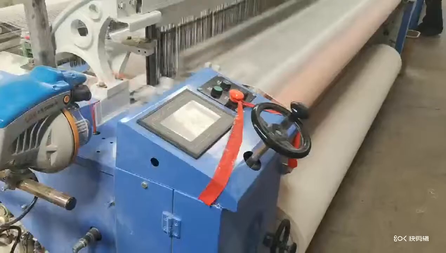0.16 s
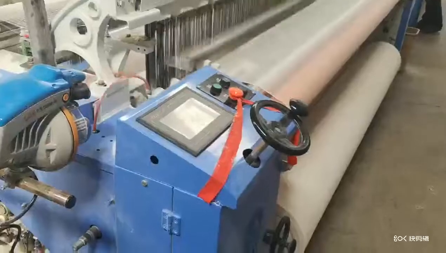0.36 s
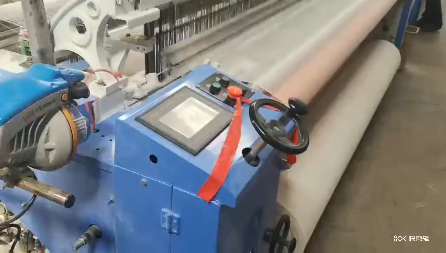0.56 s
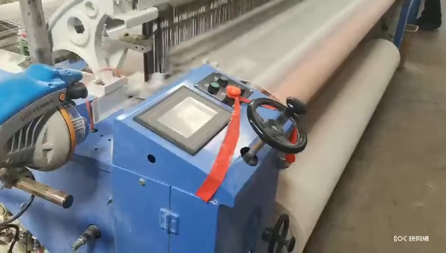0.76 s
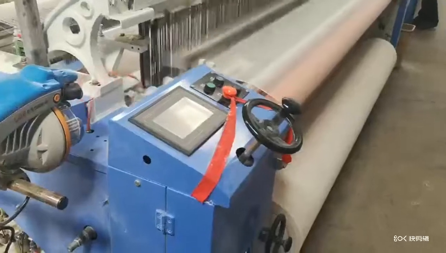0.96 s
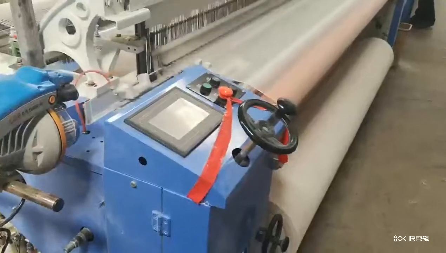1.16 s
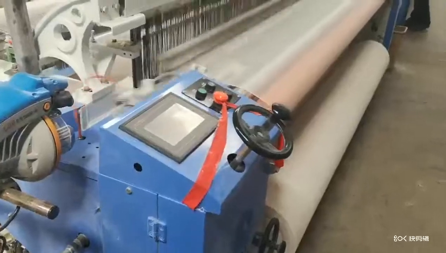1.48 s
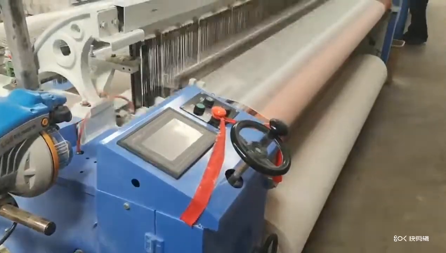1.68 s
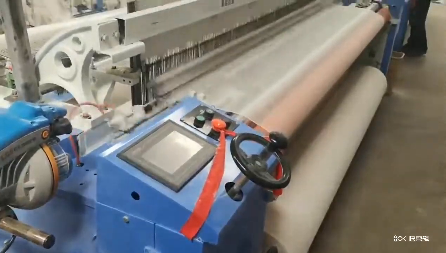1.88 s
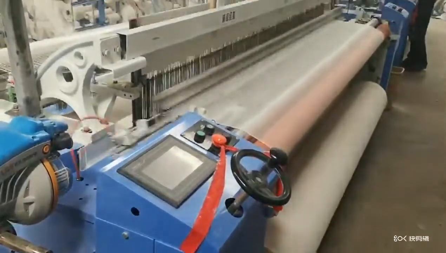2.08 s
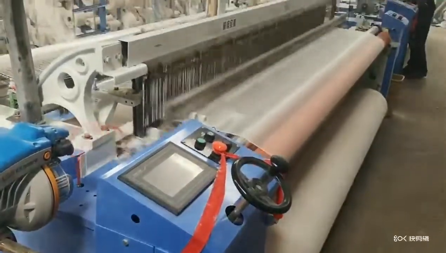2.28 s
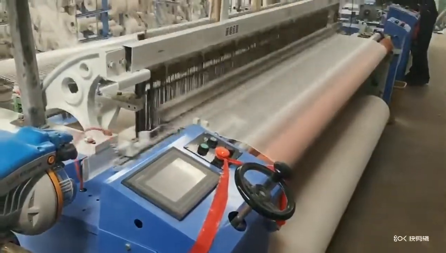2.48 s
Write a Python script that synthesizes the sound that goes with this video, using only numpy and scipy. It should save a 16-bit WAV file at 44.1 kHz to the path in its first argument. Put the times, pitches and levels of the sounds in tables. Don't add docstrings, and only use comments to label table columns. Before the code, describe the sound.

An air jet loom, silent until about 0.25 s, then abruptly at full running noise until the end near 2.6 s. About 8.3 beats per second: low ringing frame thuds, dense heddle and reed clatter, bright air hisses. Other looms roar steadily behind, with floor rumble and faint high whines. From about 1.1 to 2 s the right side grows hollow and ringing as a hand cups the phone microphone; bass fades slightly.

```python
import sys
import numpy as np
from scipy import signal
from scipy.fft import rfft, irfft
from scipy.io import wavfile
from scipy.ndimage import uniform_filter1d

SR = 44100
rng = np.random.default_rng(int(sys.argv[2]) if len(sys.argv) > 2 else 0)


def decibels_to_gain(level_db):
    exponent = np.asarray(level_db, float) / 20
    return 10 ** exponent


def generate_wav(signal):
    frames = np.transpose(np.atleast_2d(signal))
    scaled = np.clip(frames, -1, 1) * 32767
    pcm = np.round(scaled).astype(np.int16)
    wavfile.write(sys.argv[1], SR, pcm)


N = 115542

PICKS_PER_S = 8.303


def rms_one(x):
    return x / np.sqrt(np.mean(x ** 2) + 1e-20)


def at_hz(points, hz):
    table = np.array(points)
    return np.interp(np.log(hz + 1e-3), np.log(table[:, 0]), table[:, 1])


def drift(rate_hz):
    pole = np.exp(-80 * np.pi * rate_hz / SR)
    noise = rng.standard_normal(N // 40 + 2002)
    slow = signal.lfilter([1], [1, -2 * pole, pole ** 2], noise)[2000:]
    return np.interp(np.arange(N) / 40, np.arange(len(slow)), rms_one(slow))


def ringing(hz, t60_s):
    radius = decibels_to_gain(-60 / (t60_s * SR))
    return [1, -2 * radius * np.cos(2 * np.pi * hz / SR), radius ** 2]


# pitch_hz, likeness [0-1]
PORT_LIKENESS = [(90, 1.), (180, 1), (290, 0.86), (640, 0.5), (1400, 0.44), (3100, 0.03), (6800, 0.01),
                 (15000, 0.07)]


def spread(three, spectrum, low_hz, high_hz):
    hz = np.fft.rfftfreq(N, 1 / SR)
    band = (hz > low_hz) * (hz < high_hz)
    both, left, right = rfft(three) * decibels_to_gain(at_hz(spectrum, hz)) * band
    alike = np.clip(at_hz(PORT_LIKENESS, hz), 0, 1)
    mixed = np.sqrt(alike) * both + np.sqrt(1 - alike) * np.array([left, right])
    return rms_one(irfft(mixed, N))


def per_pick(middle_s, sharpness, spread_db):
    rise_skew, open_share = 0.37, 0.16
    turns = (np.arange(N) / SR - middle_s) * PICKS_PER_S
    uneven_db = np.interp(turns, np.arange(-2, 38), rng.normal(0, spread_db, 40))
    angle = 2 * np.pi * turns
    opening = np.cos(angle + rise_skew * np.cos(angle)) + open_share
    swell = 1 / (1 + np.exp(-sharpness * opening))
    return rms_one(swell * decibels_to_gain(uneven_db))


# start_s (into the pick), pitch_hz, level_db, t60_s
FRAME_BLOWS = [(.0, 21, -38, .5), (.0, 32.4, -36.5, .6), (.0, 41.5, -37.5, .6), (.1, 140, -41, 0.59),
               (.1, 109, -43, .5), (.1, 124.9, -37.5, 1), (.1, 120, -37.5, 1), (.09, 163, -44.5, .4),
               (.07, 190, -49, 0.22), (.07, 249, -37, .5), (0.091, 277, -43.5, .4), (0.091, 302, -44, .4),
               (.09, 390, -42.5, 0.19), (0.092, 426, -42, 0.2)]


def frame():
    spread_db, jitter_s = 1.2, .0003
    alternate_db, alternate_hz = 2.5, 350
    out = np.zeros(N + SR)
    picks = np.arange(-6, 22)
    for start_s, pitch_hz, level_db, t60_s in FRAME_BLOWS:
        luck = rng.standard_normal((len(picks), 2))
        when_s = 1 + picks / PICKS_PER_S + start_s + jitter_s * luck[:, 0]
        alternation_db = alternate_db * (pitch_hz > alternate_hz) * np.cos(np.pi * picks)
        clicks = np.zeros(N + SR)
        places = np.clip(when_s * SR, 0, N + SR - 1).astype(int)
        clicks[places] = decibels_to_gain(spread_db * luck[:, 1] + alternation_db)
        mode = signal.lfilter([0, 1], ringing(pitch_hz, max(t60_s, .05)), clicks + 1e-18)
        out += decibels_to_gain(level_db) * rms_one(mode)
    return out[SR:]


def clatter():
    level_db, clicks_per_s, size_db, ring_cycles = -26, 5000, 3, 18.3
    swell = per_pick(middle_s=0.0037, sharpness=2.9, spread_db=.7)
    sizes = decibels_to_gain(size_db * np.minimum(rng.exponential(1, (3, N)), 5))
    sizes = sizes * rng.choice([-1, 1], (3, N))
    clicks = sizes * (rng.random((3, N)) < clicks_per_s * swell / SR)
    dealt = rng.integers(0, 16, N)
    out = 0
    for part, pitch_hz in enumerate(np.geomspace(850, 3000, 16)):
        struck = clicks * (dealt == part) + 1e-18
        out = out + signal.lfilter([1, 0, -1], ringing(pitch_hz, ring_cycles / pitch_hz), struck)
    tone = [(800, -5), (1500, -1), (2300, 4.2), (3000, 3)]  # pitch_hz, level_db
    return decibels_to_gain(level_db) * spread(out, tone, low_hz=556, high_hz=6300)


# pitch_hz, level_db (per Hz)
AIR_SPECTRUM = [(500, -25), (760, -16.5), (1100, -16), (2200, -6.5), (3300, -7), (5000, -2), (8000, 0.5),
                (15500, -3.5)]


def blast():
    level_db, left_lag_s = -21, 0.0029
    swell = per_pick(middle_s=0.012, sharpness=3, spread_db=.3) * decibels_to_gain(.6 * drift(30))
    swell = np.array([np.roll(swell, int(left_lag_s * SR)), swell])
    air = spread(rng.standard_normal((3, N)), AIR_SPECTRUM, low_hz=430, high_hz=16700)
    return decibels_to_gain(level_db) * swell * air


# pitch_hz, level_db (per Hz)
ROAR_SPECTRUM = [(500, -10), (770, -23), (790, 0), (1500, -5.5), (2200, 0.5), (3300, -6.5), (8000, -3),
                 (15500, -7)]
# pitch_hz, level_db (per Hz)
RUMBLE_SPECTRUM = [(15, -23), (40, 8.5), (58, -3), (124, -3.5), (215, -5), (270, -4), (520, -10),
                   (800, -11)]


def hall():
    roar_db = -18.5 + .3 * drift(6)
    roar = spread(rng.standard_normal((3, N)), ROAR_SPECTRUM, low_hz=418, high_hz=17150)
    rumble_db = -29 + 0.41 * drift(6.52)
    rumble = spread(rng.standard_normal((3, N)), RUMBLE_SPECTRUM, low_hz=10.1, high_hz=780)
    return decibels_to_gain(roar_db) * roar + decibels_to_gain(rumble_db) * rumble


# pitch_hz, left_db, right_db
WHINE_TONES = [(942, -50, -50), (4802, -58, -44), (4953, -58, -46), (7434, -62, -49)]


def whine():
    t = np.arange(N) / SR
    out = 0
    for pitch_hz, left_db, right_db in WHINE_TONES:
        level_db = np.array([[left_db], [right_db]]) + 7 + 1.6 * drift(9)
        out = out + decibels_to_gain(level_db) * np.sin(2 * np.pi * pitch_hz * t + 1.1 * drift(2.0))
    return out


def scene():
    return frame() + blast() + clatter() + hall() + whine()


def bump(hz, centre_hz, octaves):
    return np.exp(-.5 * (np.log2(hz / centre_hz) / octaves) ** 2)


# start_s, cupping [0-1], hollow_hz (resonance of the hollow)
HAND_CUPPING = [
    (0.249, 0.38, 7400),
    (.7, 0.23, 7400),
    (1.099, 0.32, 7720),
    (1.45, 0.6, 7650),
    (1.7, 0.88, 7240),
    (2.0, 1, 6880),
    (2.3, 1., 6900),
    (2.62, 1.05, 6690),
]
# pitch_hz, level_db
LEFT_COLOUR = [(400, 0.5), (650, -0.5), (1300, 2), (2100, 0.5), (5000, 2.5), (9300, -2), (10500, -11),
               (15000, -15.5)]
# pitch_hz, level_db
RIGHT_COLOUR = [(400, 1), (650, -5.5), (1300, 1.5), (2800, 4), (3400, 2.5), (6300, -0.5), (9500, 1.5),
                (15000, 2.5)]
# pitch_hz, width_octaves, left_db, right_open_db, right_cupped_db
CASE_RESONANCES = [(4300, .15, -2, 0, -3), (5630, 0.017, .1, -9, 6.5), (7540, 0.012, 1.5, -4, 3.8),
                   (9300, 0.034, 3, 2.5, -0.5), (10460, 0.024, -7, 5.5, -1.5), (12040, 0.056, -1, 2, -2),
                   (13200, .05, 1.5, 3, 2), (14200, .015, -2, -5, 0)]
# pitch_hz, lead_rad
LEFT_LEAD = [(150, .0), (430, .6), (700, 1), (1300, 0.13), (2300, .0)]


def ports(x):
    hz, s, z = signal.stft(x, SR, nperseg=1024)
    hz = hz[:, None] + 1
    times, cups, hollows = np.transpose(HAND_CUPPING)
    cup = np.interp(s, times, cups)
    hollow_hz = np.interp(s, times, hollows)

    bass_db = -5 * (s * SR / N - .5) / (1 + (hz / 60) ** 2)
    left_db = at_hz(LEFT_COLOUR, hz) * (hz > 300) + bass_db
    right_db = at_hz(RIGHT_COLOUR, hz) * (hz > 300) + bass_db

    left_db = left_db - 2.5 * cup / (1 + (4000 / hz) ** 2)
    right_db = right_db - 4 * cup / (1 + (8800 / hz) ** 6)
    open_db, shut_db = 1, 9.5
    right_db = right_db + (open_db + (shut_db - open_db) * cup) * bump(hz, hollow_hz, octaves=0.097)
    right_db = right_db + 4 * cup * bump(hz, 2840, octaves=0.067)

    for case_hz, octaves, case_left_db, case_open_db, case_cupped_db in CASE_RESONANCES:
        bell = bump(hz, case_hz, octaves)
        left_db = left_db + case_left_db * bell
        right_db = right_db + (case_open_db + (case_cupped_db - case_open_db) * cup) * bell

    flicker = uniform_filter1d(rng.standard_normal(z.shape), size=24, axis=1)
    flicker = uniform_filter1d(flicker, size=3, axis=2)
    flicker_db = .9 * rms_one(flicker) * (hz > 700)
    z = z * decibels_to_gain(np.array([left_db, right_db]) + flicker_db)
    z[0] *= np.exp(1j * at_hz(LEFT_LEAD, hz) * (hz > 150))
    return signal.istft(z, SR, nperseg=1024)[1][:, :N]


def roll_off(x):
    return signal.sosfilt(signal.butter(12, 16320, fs=SR, output="sos"), x)


def record(dry):
    start_s, settle_db, settle_s = .2536, 2, 0.021
    top_cut = signal.ellip(14, .5, 95, 15140, fs=SR, output="sos")
    bottom_cut = signal.butter(2, 12, "high", fs=SR, output="sos")
    x = signal.sosfilt(top_cut, ports(dry))
    x = signal.sosfilt(bottom_cut, x)
    since_s = np.arange(N) / SR - start_s
    gain_db = settle_db * np.exp(-np.abs(since_s) / settle_s)
    return roll_off(x * (since_s > 0) * decibels_to_gain(gain_db))


dry = scene()
out = record(dry)
generate_wav(out)
```